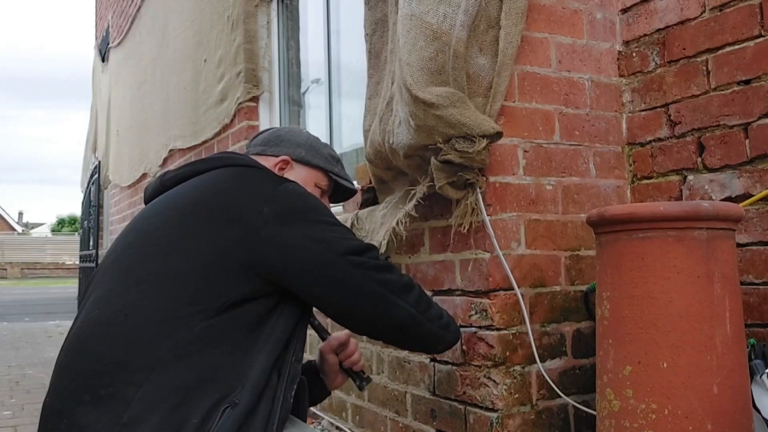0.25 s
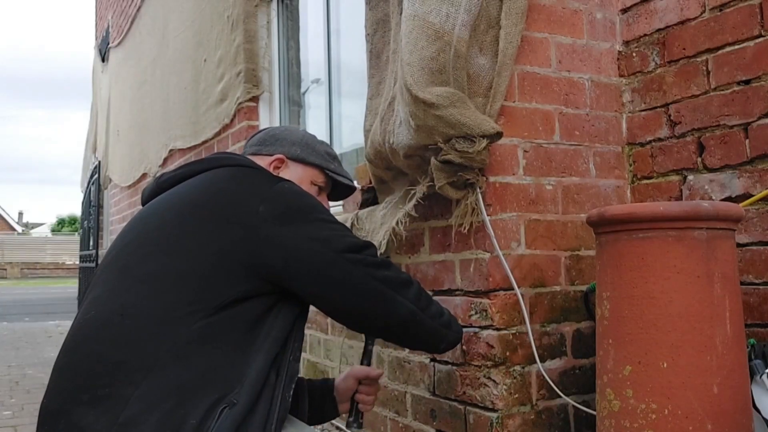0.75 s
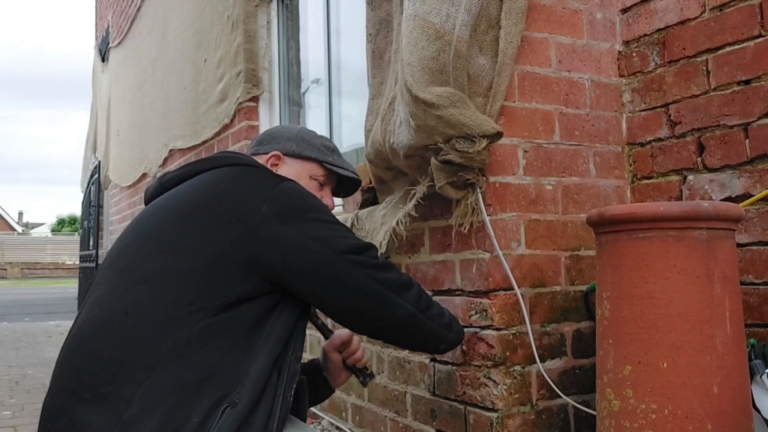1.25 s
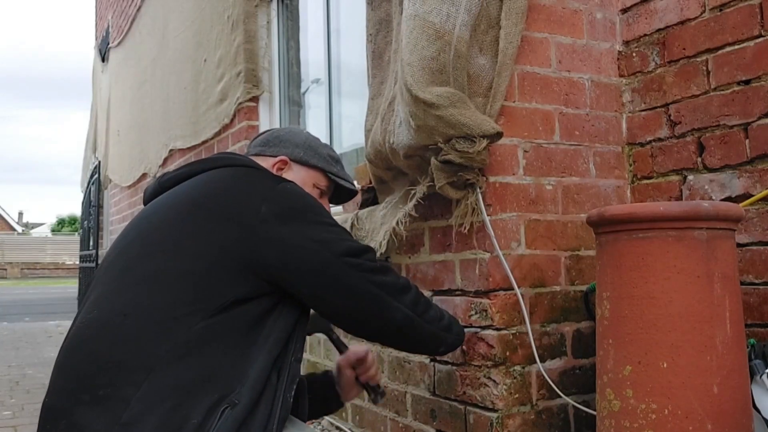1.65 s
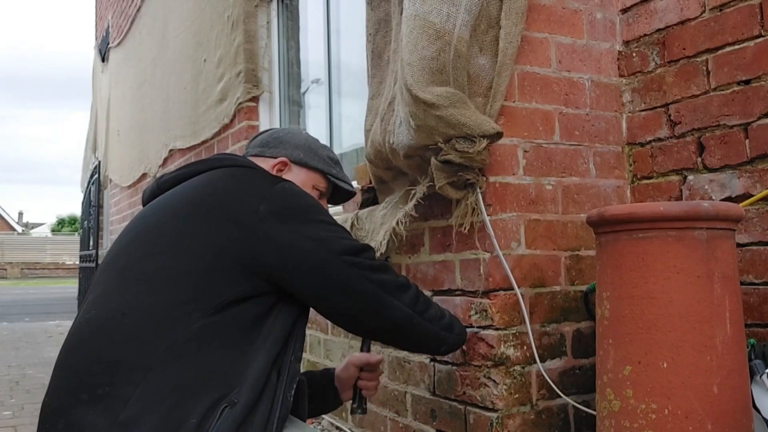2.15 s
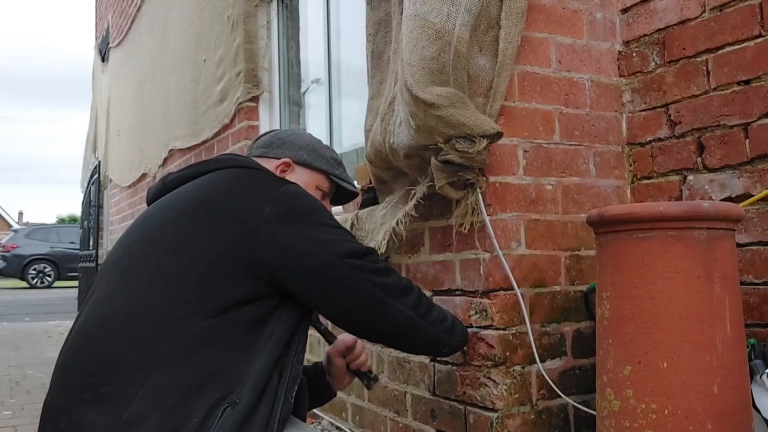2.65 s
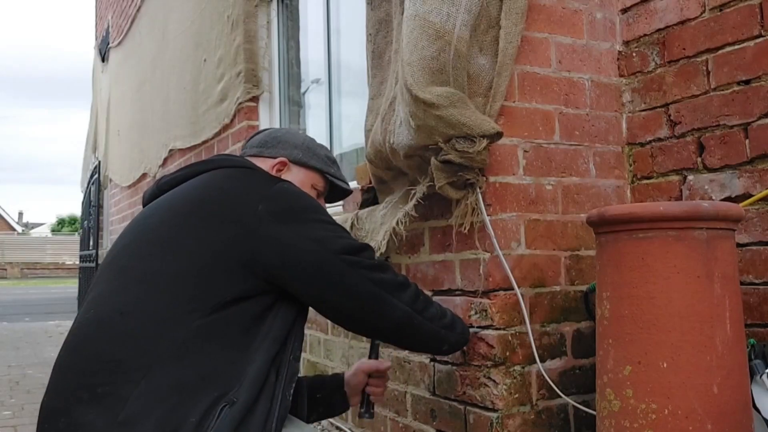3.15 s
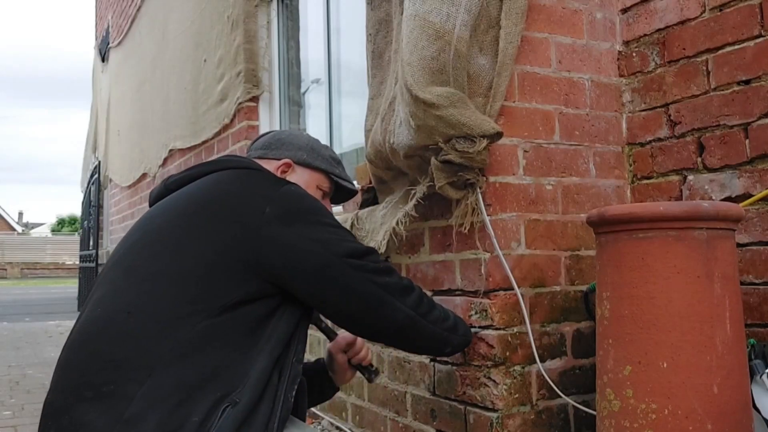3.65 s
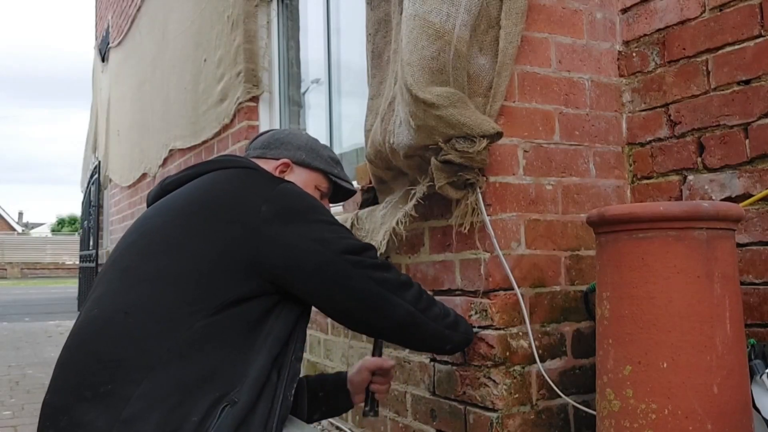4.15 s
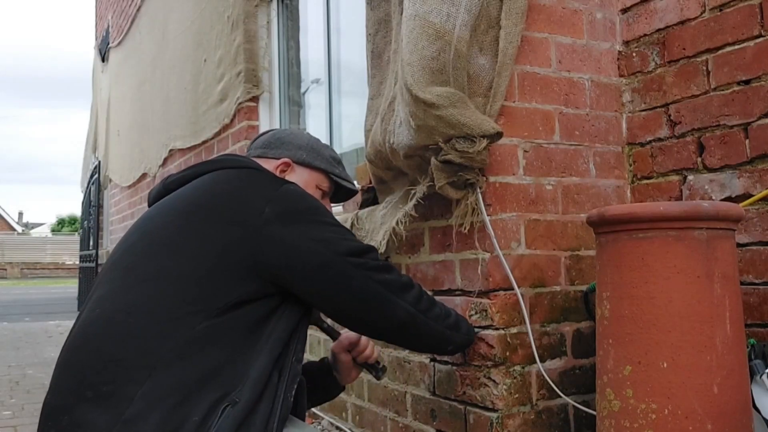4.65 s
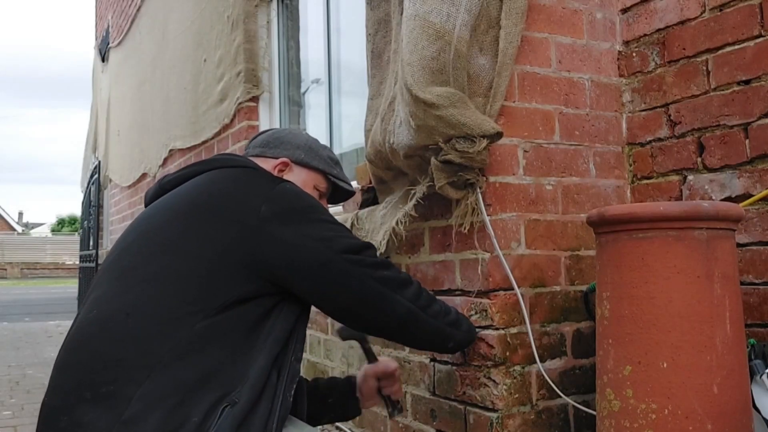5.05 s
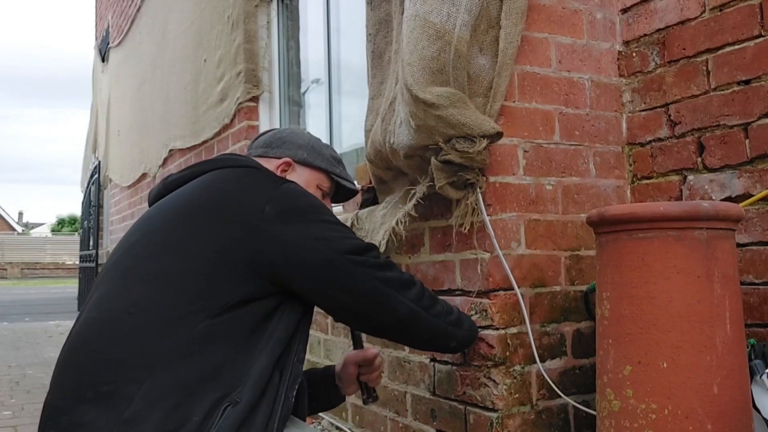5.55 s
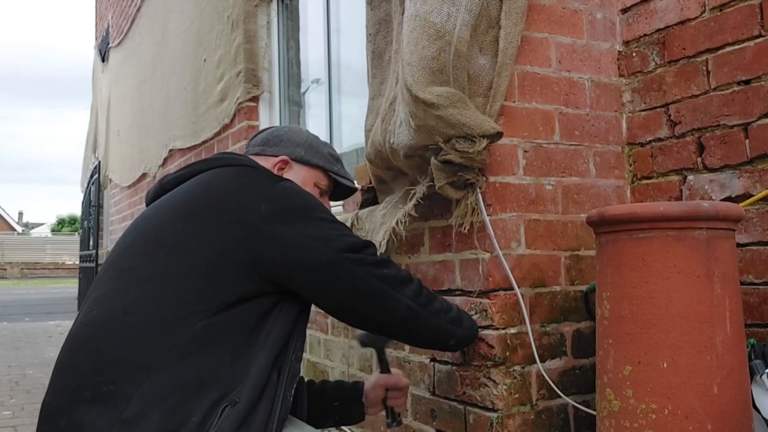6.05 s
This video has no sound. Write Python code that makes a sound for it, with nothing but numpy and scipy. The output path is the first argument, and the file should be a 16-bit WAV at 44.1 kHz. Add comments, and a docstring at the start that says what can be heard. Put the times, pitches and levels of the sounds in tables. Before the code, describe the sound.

Regular sharp steel-on-steel strikes, close and central, never quite identical. At first they are mostly bright metal with little wall; from about the middle they gain a dull, resonant brick thud and a quick secondary clank as the hammer bounces, with tiny crumbling cracks. House walls return a short scattered ring, houses opposite answer faintly, and a quiet street of hollow roar and engine drone continues underneath, dipping slightly between blows.

```python
"""A club hammer drives a steel chisel into the mortar of an old brick wall, three blows a second, outdoors.
Each blow layers a bright burst of steel noise, a damped ping and a dull, resonant thud in the brickwork.
As the chisel bites deeper the hammer rebounds onto it: a weaker clank, with a shower of crumbling mortar.
House walls scatter a short ringing tail, and the houses across the street answer faintly.
Behind, filtered noise makes the traffic: hollow roar, engine drone, rumble, one car passing, over still air."""
import sys
import numpy as np
from scipy import signal
from scipy.fft import rfft, irfft
from scipy.io import wavfile
from scipy.ndimage import uniform_filter1d

SR = 44100
rng = np.random.default_rng(int(sys.argv[2]) if len(sys.argv) > 2 else 0)


def waveform_to_disk(signal):
    """Save audio, clipped to [-1, 1], as 16-bit WAV at the path in sys.argv[1]."""
    frames = np.transpose(np.atleast_2d(signal))
    scaled = np.clip(frames, -1, 1) * 32767
    samples = np.round(scaled).astype(np.int16)
    wavfile.write(sys.argv[1], SR, samples)


N = 277389
LEAD, LENGTH = 600, 16384  # samples: run-up before a blow, whole length of its sound
T = (np.arange(LENGTH) - LEAD) / SR  # seconds around one blow
AFTER = np.maximum(T, 0)
CLOCK = np.arange(N) / SR


def amp(db):
    """Decibels to gain."""
    return 10 ** (np.asarray(db) / 20)


def evened(x):
    """Scales to rms 1."""
    return x / np.sqrt(np.mean(x ** 2) + 1e-20)


def levelled(x, db, start, stop):
    """Scales a blow's sound to the rms level db between two of its moments (s)."""
    window = x[(T >= start) & (T < stop)]
    return amp(db) * x / np.sqrt(np.mean(window ** 2) + 1e-20)


def coloured(x, points, peaks=()):
    """Filters by a smooth spectrum with resonance peaks on top."""
    hz = np.fft.rfftfreq(len(x), 1 / SR)
    f, db = np.transpose(points)
    db = np.interp(np.log(hz + 1), np.log(f), db)
    for centre, width, height in peaks:
        db = db + height / (1 + (2 * (hz - centre) / width) ** 2)
    return irfft(rfft(x) * amp(db), len(x))


def band(x, lo_hz, hi_hz, order=8):
    """Keeps one band, without delay."""
    hz = np.fft.rfftfreq(len(x), 1 / SR) + 1
    low_side = 1 + (lo_hz / hz) ** (2 * order)
    high_side = 1 + (hz / hi_hz) ** (2 * order)
    return irfft(rfft(x) / np.sqrt(low_side * high_side), len(x))


def resonate(x, hz, width):
    """A resonance that follows the curve hz: shift it down to zero, smooth, shift back up."""
    turn = np.exp(2j * np.pi * np.cumsum(hz * np.ones(len(x))) / SR)
    r = np.exp(-np.pi * width / SR)
    return 2 * (turn * signal.lfilter([1 - r], [1, -r], x / turn)).real


def lumpy(size, count, depth_db):
    """A gain that swells and sinks at random over about count samples."""
    smooth = uniform_filter1d(rng.standard_normal(size), count)
    return amp(depth_db * evened(uniform_filter1d(smooth, count)))


def hum(centre_hz, width_hz):
    """A damped mode shaken at random: noise in one bell-shaped band."""
    hz = np.fft.rfftfreq(LENGTH, 1 / SR)
    bell = np.exp(-((hz - centre_hz) / width_hz) ** 2)
    return evened(irfft(rfft(rng.standard_normal(LENGTH)) * bell))


def along(curve):
    """The columns of a curve at every sample."""
    s, *columns = np.transpose(curve)
    return [np.interp(CLOCK, s, column) for column in columns]


def akin(pattern, alike):
    """Noise that partly repeats a pattern: the same tool and wall, never the same blow."""
    alike = np.clip(alike, 0, 1)
    return np.sqrt(alike) * pattern + np.sqrt(1 - alike) * rng.standard_normal(LENGTH)


def add(mix, s, sound):
    """Lays a blow's sound into the mix at s."""
    part = mix[round(s * SR) - LEAD:][:len(sound)]
    part += sound[:len(part)]


# spectrum of the still air: [f/Hz, level/dB]
AIR_COLOUR = [(20, -29), (70, 7), (200, 14.5), (290, 16.5), (400, 13.5), (800, 16), (1300, 9.5),
              (1800, 1.5), (2150, -4.5), (5000, -11), (12000, -12), (16000, -17)]


def still_air():
    """A steady bed of noise, fullest in the low mids."""
    return amp(-63) * evened(coloured(rng.standard_normal(N), AIR_COLOUR))


# deep traffic rumble over time: [t/s, level/dB]
RUMBLE_CURVE = [(0, -50.5), (.22, -55), (.42, -73), (6.29, -71)]


def rumble():
    """Deep rumble of the traffic: noise between 52 and 85 Hz."""
    level_db, = along(RUMBLE_CURVE)
    return amp(level_db) * evened(band(rng.standard_normal(N), 52, 85, order=6))


# engine drone over time: [t/s, level/dB]
DRONE_CURVE = [(0, -62.5), (.68, -55.5), (1.1, -63.5), (2.1, -68), (2.38, -56.5), (2.8, -63.5), (3.75, -56),
               (4.4, -56), (4.7, -65), (5.77, -58), (6.29, -83)]


def engine_drone():
    """Noise through two low resonances in series, throbbing unevenly."""
    level_db, = along(DRONE_CURVE)
    engine = resonate(resonate(rng.standard_normal(N), 160, 75), 240, 85)
    return amp(level_db) * evened(engine * lumpy(N, count=4000, depth_db=3.5))


# hollow traffic roar over time: [t/s, centre f/Hz before its waver, level/dB]
ROAR_CURVE = [(0, 1010, -57), (.3, 982, -65), (.48, 597, -67.5), (.64, 572, -47), (.98, 596, -64),
              (1.28, 589.4, -50), (1.52, 640, -63.5), (1.96, 878, -52), (2.12, 416.5, -60),
              (2.3, 407, -44.5), (2.72, 429, -41.5), (2.95, 380.4, -57), (3.5, 398.4, -76),
              (4.15, 564.7, -59), (4.45, 856, -56.5), (5.1, 897, -57), (5.8, 740, -54.5),
              (6.29, 755, -83.5)]


def traffic_roar():
    """Noise through three ever wider resonances that drift together in pitch."""
    roar_hz, level_db = along(ROAR_CURVE)
    waver = evened(band(rng.standard_normal(N), 1.9, 9, order=3))
    roar_hz = roar_hz * (1 + 0.041 * waver)
    roar = rng.standard_normal(N)
    for width_hz in (140, 280, 420):
        roar = resonate(roar, roar_hz, width_hz)
    return amp(level_db) * evened(roar * lumpy(N, count=1500, depth_db=2.5))


# spectrum of the tyre hiss: [f/Hz, level/dB]
TYRE_COLOUR = [(300, -6.5), (1000, 4.5), (1400, 2), (1850, 1), (2200, -6.5), (4000, -16.5), (8000, -23.5),
               (16000, -41.5)]
PASS_S, PASS_HALF_S = 2.52, 0.32  # a car is nearest; time from there to half its amplitude
PASS_DB, FAR_TYRES_DB = -56.5, -74  # tyres of the passing car at its nearest; distant tyres


def tyres():
    """Tyre hiss: one car swells past over the steady hiss of distant ones."""
    nearness = 1 / (1 + ((CLOCK - PASS_S) / PASS_HALF_S) ** 2)
    level = np.hypot(amp(FAR_TYRES_DB), amp(PASS_DB) * nearness)
    return level * evened(coloured(rng.standard_normal(N), TYRE_COLOUR))


def street():
    """The whole street behind the work."""
    return traffic_roar() + engine_drone() + rumble() + tyres() + still_air()


# spectrum of the answer from across the street: [f/Hz, level/dB]
STREET_ECHO_COLOUR = [(60, -3), (200, 7.5), (400, -10.5), (600, 8), (1000, 6.5), (1400, -7.5), (1800, -9.5),
                      (2100, -21.5), (4600, -31.5), (15000, -32)]


def street_echo(x, db, t60):
    """A faint, dull answer from the houses across the street: a decaying spray of random reflections."""
    t = np.arange(SR) / SR
    fade_in = np.clip(t / 0.026, 0, 1) ** 2
    taps = rng.standard_normal(SR) * amp(-60 * t / t60) * fade_in
    response = coloured(taps / np.linalg.norm(taps), STREET_ECHO_COLOUR)
    return amp(db) * signal.fftconvolve(x, response)[:N]


def dying(t60, knee):
    """Envelope of the near echoes: a fall that grows steeper and steeper."""
    onset = 1 - np.exp(-AFTER / 0.00049)
    return onset * amp(-60 * AFTER / t60 - 10 * (AFTER / knee) ** 3)


def ring(hz, db, tail_db):
    """One lasting mode of the steel: the further it stands above the echoes, the purer and longer it is."""
    freedom = np.clip((db - tail_db + 9) / 12, 0, 1)
    width_hz = (120 + .022 * hz) * (1 - .5 * freedom)
    envelope = dying(t60=0.45, knee=0.07 + .028 * freedom)
    return levelled(hum(hz, width_hz) * envelope, db - .5, .04, 0.086)


# free ringing of hammer and chisel, also heard in the tail: [f/Hz, width/Hz, level/dB above its surroundings]
FREE_RINGING = [(2420, 110, 5.5), (2690, 120, 3.5), (3310, 130, 5.5), (4040, 120, 7.5), (4475, 96, 1.5),
                (5920, 200, 4), (6730, 60, 7), (8160, 470, 6.5), (9940, 810, 5.5), (11050, 300, 7),
                (12100, 620, 5)]


def afterglow(db):
    """What is left once the near echoes have gone: a faint hiss, and a narrow band that swells briefly."""
    hiss = band(rng.standard_normal(LENGTH), 1500, 13500)
    hiss = evened(coloured(hiss, [(2000, 6), (6000, -3.0), (14000, -15.5)], FREE_RINGING))
    hiss = hiss * amp(-13.0 - 60 * AFTER / .5) * (T > .02)
    late_s, swell_hz = rng.uniform(.11, .145), rng.uniform(1730, 1850)
    swell = hum(swell_hz, width_hz=58) * np.exp(-((T - late_s) / 0.029) ** 2)
    return amp(db) * (hiss + amp(-20.5) * swell)


# spectrum of the echo tail: [f/Hz, level/dB]
TAIL_COLOUR = [(400, -8.5), (1000, 2.5), (2000, -0.5), (3500, -5.5), (4600, -2), (5300, -5), (6200, -1),
               (7500, -3), (9500, -8.5), (13000, -4), (15300, -13.5)]
# chisel modes that ring a little at every blow: [f/Hz, typical level/dB before the 0.5 dB trim in ring()]
CHISEL_MODES = [(3320, -56.5), (4050, -57.5), (4560, -54), (6560, -55), (12450, -52.5)]
RING_SPREAD_DB = 3.5  # each mode's strength varies at random from blow to blow


def tail(db, ring_hz, ring_db):
    """Ringing steel scattered by the walls in uneven echoes; each mode's strength varies at random."""
    modes = []
    for hz, width, height in FREE_RINGING:
        shifted_hz = hz * (1 + .012 * rng.standard_normal())
        modes.append((shifted_hz, width, height + RING_SPREAD_DB * rng.standard_normal()))
    uneven = rng.standard_normal(LENGTH) * lumpy(LENGTH, count=150, depth_db=2.3)
    echoes = coloured(uneven, TAIL_COLOUR, modes)
    sound = levelled(echoes * dying(t60=.235, knee=.082), db + 0.5, 0.032, .095)
    sound = sound + ring(ring_hz, ring_db, db)
    for hz, mode_db in CHISEL_MODES:
        sound = sound + ring(hz, mode_db + RING_SPREAD_DB * rng.standard_normal(), db)
    return sound + afterglow(db)


def grit(db, per_s, fade):
    """Mortar crumbles under the edge: a short shower of tiny cracks."""
    struck = rng.random(LENGTH) < per_s / SR
    cracks = rng.standard_normal(LENGTH) * struck * (T > 0) * np.exp(-AFTER / fade)
    colour = [(300, -17), (1200, -2.0), (3200, 4.5), (6500, -3), (14000, -16.5)]
    return levelled(coloured(cracks, colour), db, 0, 0.018)


# spectrum of the thud in the wall: [f/Hz, level/dB]
THUD_COLOUR = [(30, -57), (68, -9.5), (105, -15), (160, -4), (240, -8.5), (400, -3), (560, 2), (720, -10),
               (950, -11), (1300, -13), (2400, -27), (5000, -56.5)]
# resonances of the brickwork: [f/Hz, width/Hz, level/dB above the thud]
BRICK_MODES = [(172, 43, 9.5), (179, 55, 3), (346.5, 21, 10.5), (416, 35, 7), (493, 17, 2.5), (706, 36, 2),
               (946, 14, 9)]


def thud(drive, db, rise, t60):
    """The brickwork takes up the blow more slowly and booms; a louder thud has more middle and less depth."""
    envelope = (1 - np.exp(-(AFTER / rise) ** 2)) * amp(-60 * AFTER / t60)
    deep_db = -.2 * (db + 26.0)
    middle_db = 0.58 * (db + 27)
    boom = coloured(drive, THUD_COLOUR, BRICK_MODES)
    boom = coloured(boom, [(220, deep_db), (330, 0.0018)], [(368, 120, middle_db)])
    return levelled(boom * envelope, db, 0, 0.015)


# envelope of one clash, soft lead-in, sudden rise, short hold, fall:
# [t/ms before shift and squeeze, relative level/dB]
CLASH_SWELL = [(-13, -60), (-5.5, -26), (-4, -14.5), (-3.5, -1), (0.5, 0.5), (5, -10), (11, -24),
               (26.5, -60.5)]


def clash_envelope(brevity, early_ms):
    """Envelope of a clash, squeezed in time by brevity."""
    ms, db = np.transpose(CLASH_SWELL)
    return amp(np.interp((T * 1000 + early_ms) * brevity, ms, db, left=-200, right=-200))


# spectrum of the clash: [f/Hz, level/dB]
CLASH_COLOUR = [(150, -22), (700, -13), (1200, -4), (2200, -6), (3300, 1), (5500, 5), (8000, -3.5),
                (9500, -7.5), (13000, -9.5), (15300, -18.5)]
# resonances of the steel while it is struck: [f/Hz, width/Hz, typical level/dB above the clash]
STRUCK_MODES = [(1153, 16, 6), (1374, 53, 9), (1800, 110, 7), (2310, 110, 1.5), (2860, 92, -2),
                (3150, 120, 3), (3380, 700, 3.5), (4740, 160, 6), (6030, 370, 4), (6360, 120, 3.5),
                (6860, 57, 8.5), (8150, 140, 7.5), (10060, 330, 1.5), (12320, 280, 12)]


def clash(drive, clash_db, knock_hz, knock_db, fizz_db, ping_hz, ping_db, brevity, clank_db, dull_db):
    """Steel on steel: a dense burst in three registers, with a low clank peak and a damped ping."""
    modes = [(hz, width, height + 2.5 * rng.standard_normal()) for hz, width, height in STRUCK_MODES]
    steel = coloured(drive, CLASH_COLOUR, modes + [(knock_hz, 260, clank_db)])
    steel = coloured(steel, [(5500, 0.0029), (15000, -dull_db)])  # positive dulls the top, negative brightens
    half = .005 / brevity  # seconds either side of the blow where levels are set
    knock = levelled(band(steel, 120, 2600) * clash_envelope(brevity, early_ms=1.0), knock_db, -half, half)
    body = levelled(band(steel, 2600, 9000) * clash_envelope(brevity, early_ms=0.3), clash_db, -half, half)
    fizz = levelled(band(steel, 9700, 24000) * clash_envelope(brevity, early_ms=0.41), fizz_db, -half, half)
    # the ping: a weaker, slightly narrower band reinforces the first at the same pitch
    pair = hum(ping_hz, width_hz=220) + amp(-10.5) * hum(ping_hz, width_hz=190)
    ping = levelled(pair * clash_envelope(brevity, early_ms=-.3), ping_db - .6, -half, half)
    return knock + body + fizz + ping


# the hammer falls back on the chisel, one row a rebound; ping level before a 0.6 dB trim:
# [t/s, clash level/dB, knock f/Hz, knock level/dB, ping f/Hz, ping level/dB]
REBOUND_ROWS = [(0.869, -41, 2250, -31.5, 2290, -43.5), (1.1984, -26.5, 2720, -24.5, 4600, -21),
                (2.2325, -25.5, 1125, -32.5, 3080, -37), (2.9258, -19.5, 1153, -29, 4880, -33.5),
                (3.269, -24, 1936, -27, 4490, -19.5), (3.599, -20, 2379, -27, 4660, -15.5),
                (3.9353, -17.5, 1810, -29, 4580, -21), (4.2678, -22, 2476, -23, 4640, -10.5),
                (4.599, -20.5, 936, -23.5, 3100, -23.5), (4.6187, -35, 870, -29.5, 4550, -31.5),
                (4.9327, -18.5, 953, -19, 5070, -30), (5.2729, -31, 899, -22, 3410, -28),
                (5.6179, -28, 924, -23, 3250, -22.5), (5.9431, -23, 1450, -20.5, 3106, -29.5),
                (6.2713, -26, 897, -20.5, 3720, -23)]
# a rebound's fizz and grit lie below its clash, its thud below its knock
REBOUND_FIZZ_DB, REBOUND_GRIT_DB, REBOUND_THUD_DB = -16, -10, -5


def rebounds(out, steel, wall):
    """The falling hammer strikes again: a shorter, duller clash with a strong clank, a thud and grit."""
    for s, clash_db, knock_hz, knock_db, ping_hz, ping_db in REBOUND_ROWS:
        drive = akin(steel, alike=0.029)
        fizz_db = clash_db + REBOUND_FIZZ_DB
        add(out, s, clash(drive, clash_db, knock_hz, knock_db, fizz_db, ping_hz, ping_db,
                          brevity=1.6, clank_db=26.5, dull_db=18.0))
        add(out, s, thud(akin(wall, alike=0.17), knock_db + REBOUND_THUD_DB, rise=0.0046, t60=0.091))
        add(out, s, grit(clash_db + REBOUND_GRIT_DB, per_s=2000, fade=0.013))


# one row a blow; ping and ring levels before trims of 0.6 and 0.5 dB: [t/s, clash level/dB, knock level/dB,
# fizz level/dB, ping f/Hz, ping level/dB, ring f/Hz, ring level/dB, brevity factor]
BLOW_ROWS = [(0.1643, -15.5, -26.5, -17.5, 6352, -12.5, 6341, -46, 0.78),
             (0.51, -15.5, -26.5, -17, 6745, -12, 6669, -46, 0.91),
             (0.8506, -17.5, -24.5, -17, 4060, -17.5, 3994, -53, 0.92),
             (1.1776, -16.5, -23.5, -16, 6950, -17, 4586, -54, 1),
             (1.5209, -15.5, -24, -19, 7040, -11.5, 7240, -47, 1.11),
             (1.8739, -13.5, -20.5, -19, 4230, -14.5, 4532, -39, 1.02),
             (2.2181, -14, -24, -16, 5580, -21, 4005, -45, 1.13),
             (2.5652, -17.5, -21.5, -18, 4550, -14.5, 4543, -47.5, 0.96),
             (2.906, -12, -30.5, -17.5, 7570, -17.5, 4543, -43.5, 1.22),
             (3.2398, -16, -25, -20.5, 4620, -10, 6380, -44, 1),
             (3.5699, -17.5, -24.5, -21.5, 4645, -9.5, 6718, -47, 0.78),
             (3.9125, -14.5, -22, -18, 4687, -9, 6723, -43, 1.35),
             (4.238, -15.5, -20.5, -15, 4590, -10.5, 4419, -56.5, 1.1),
             (4.5723, -14.5, -21.5, -15.5, 5750, -18.5, 4667, -48.5, 1.12),
             (4.909, -12.5, -21, -18, 4710, -19, 4435, -45.5, 1),
             (5.2496, -11.5, -19.5, -17, 4705, -18.5, 4430, -45.5, 1.05),
             (5.5828, -12.5, -18, -14, 4705, -14.5, 4247, -47.5, 1.05),
             (5.9125, -15, -22, -15.5, 7972, -18.5, 4161, -60, 0.99),
             (6.2362, -18, -21.5, -15.5, 5259, -14.5, 4451, -51, 1.16)]
# how firmly the chisel bites into the joint: [t/s, bite 0-1]
BITE_CURVE = [(.16, 0.09), (.5, 0.1), (1, 0.54), (2.55, 0.42), (2.95, 0.86), (3.9, 0.99), (5.3, 0.93),
              (6.25, 0.78)]
# a firmer bite sends more of the blow into the wall and makes the knock higher
THUD_DB, THUD_BITE_DB = -38, 15  # without bite; gained at full bite
KNOCK_HZ, KNOCK_BITE_HZ = 1130, 690
# the echoes follow the force of the blow: level at a usual clash, and dB gained per dB of clash
USUAL_CLASH_DB, TAIL_DB, TAIL_SLOPE = -14.5, -41.5, .35


def blows(out, steel, wall):
    """Each blow is a clash, a thud and a tail; force and bite set the balance of steel, wall and echoes."""
    for s, clash_db, knock_db, fizz_db, ping_hz, ping_db, ring_hz, ring_db, brevity in BLOW_ROWS:
        bite = np.interp(s, *np.transpose(BITE_CURVE))
        knock_hz = KNOCK_HZ + KNOCK_BITE_HZ * bite ** 4
        thud_db = THUD_DB + THUD_BITE_DB * bite
        tail_db = TAIL_DB + TAIL_SLOPE * (clash_db - USUAL_CLASH_DB)
        drive = akin(steel, alike=0.053)
        add(out, s, clash(drive, clash_db, knock_hz, knock_db, fizz_db, ping_hz, ping_db,
                          brevity, clank_db=7.5, dull_db=-0.5))
        add(out, s, thud(akin(wall, alike=0.2), thud_db, rise=0.0032, t60=0.21))
        add(out, s, tail(tail_db, ring_hz, ring_db))


def hammering():
    """All blows and rebounds, sharing one noise pattern for the steel and one for the wall."""
    out = np.zeros(N)
    steel, wall = rng.standard_normal((2, LENGTH))
    blows(out, steel, wall)
    rebounds(out, steel, wall)
    return out


def scene():
    """The work is straight ahead, so both channels hear the same."""
    work = hammering()
    mix = work + street_echo(work, db=-20.5, t60=0.37) + street()
    return np.array([mix, mix])


# suppressor: fully open above a level, which it remembers while that memory falls; below it the sound sinks
OPEN_DB, FORGET_DB_PER_S, SINK_SLOPE, DEEPEST_DB = -31, 113, .65, -4


def suppressed(x):
    """Each blow opens the noise suppressor; it closes again before the next one."""
    power = uniform_filter1d((x ** 2).mean(0), size=600)
    level_db = 10 * np.log10(abs(power) + 1e-12)
    fall_db = FORGET_DB_PER_S * CLOCK
    held_db = np.maximum.accumulate(level_db + fall_db) - fall_db  # peaks hold, then fall steadily
    gain_db = np.clip(SINK_SLOPE * (held_db - OPEN_DB), DEEPEST_DB, 0)
    return x * amp(uniform_filter1d(gain_db, size=400))


def record(dry):
    """Cuts the deepest bass, sinks the background between blows, rounds the loudest peaks, limits the band."""
    dry = signal.sosfilt(signal.butter(2, 45, "highpass", fs=SR, output="sos"), dry)
    dry = suppressed(dry)
    ceiling = .73
    rounded = dry / (1 + (dry / ceiling) ** 6) ** (1 / 6)
    low_pass = signal.firwin(255, 15750, window=("kaiser", 9), fs=SR)
    return signal.oaconvolve(rounded, low_pass[None], "same")


dry = scene()
out = record(dry)
waveform_to_disk(out)
```